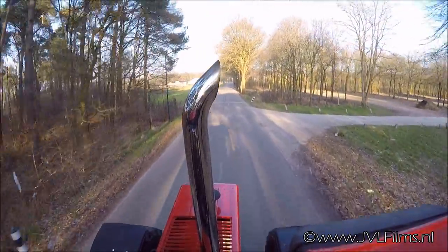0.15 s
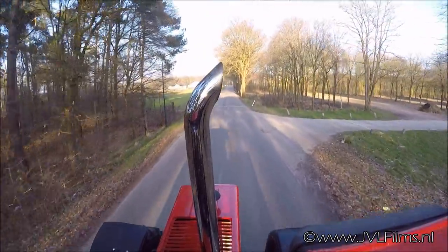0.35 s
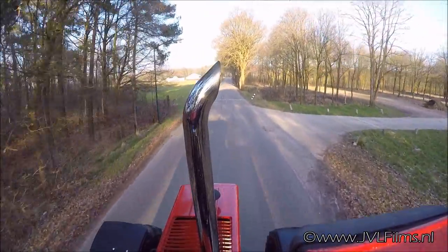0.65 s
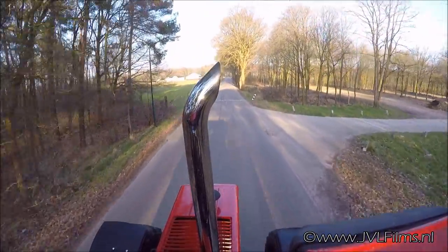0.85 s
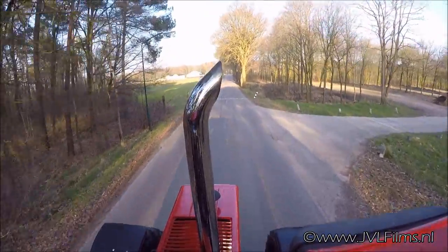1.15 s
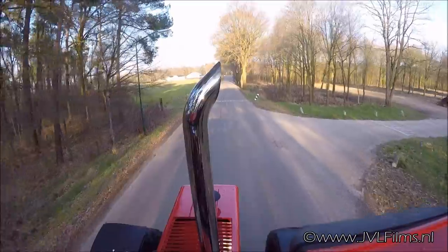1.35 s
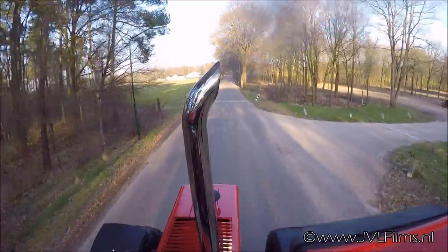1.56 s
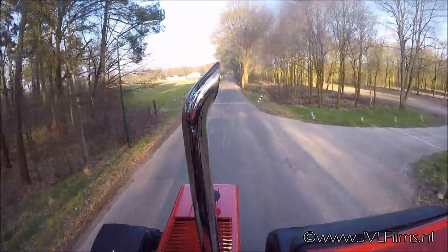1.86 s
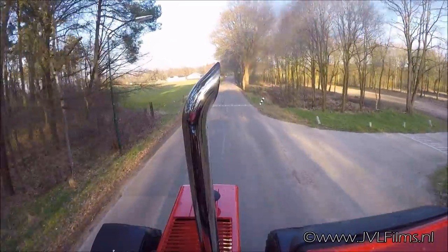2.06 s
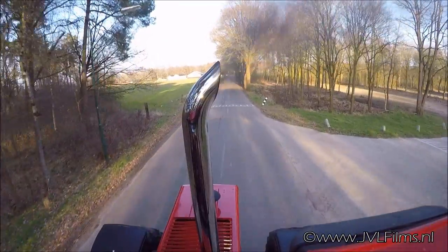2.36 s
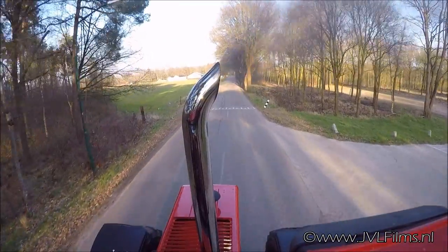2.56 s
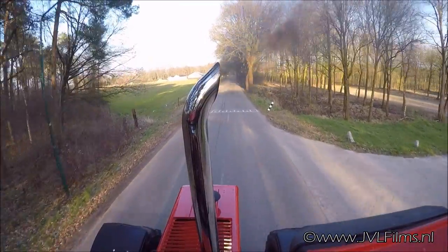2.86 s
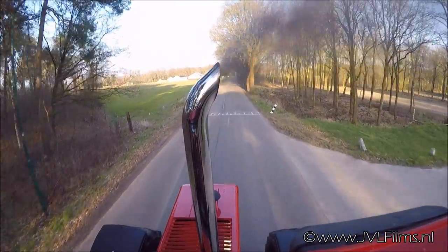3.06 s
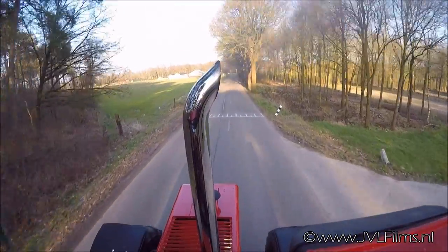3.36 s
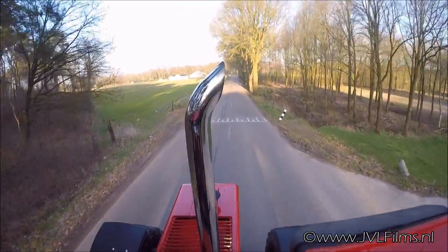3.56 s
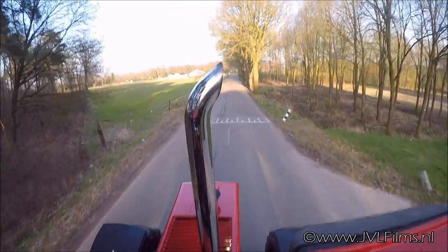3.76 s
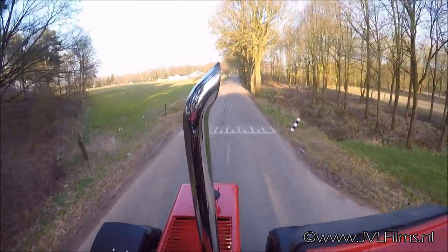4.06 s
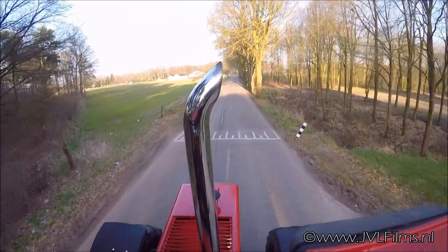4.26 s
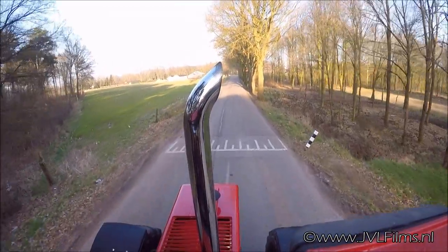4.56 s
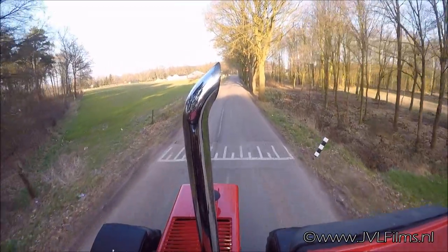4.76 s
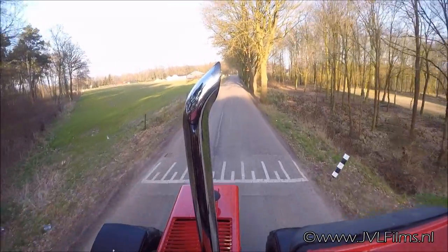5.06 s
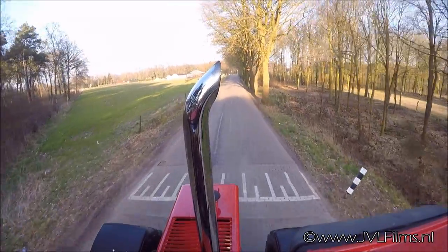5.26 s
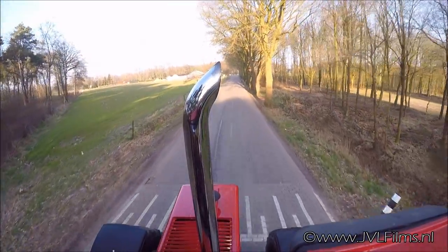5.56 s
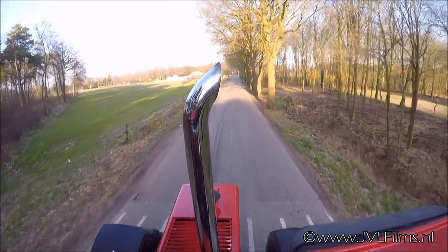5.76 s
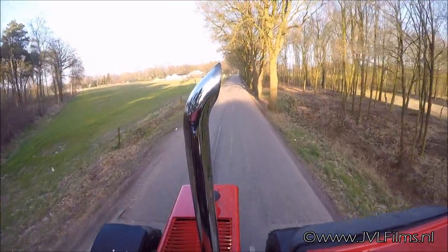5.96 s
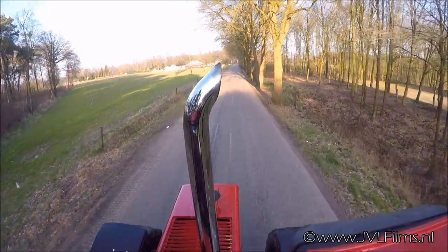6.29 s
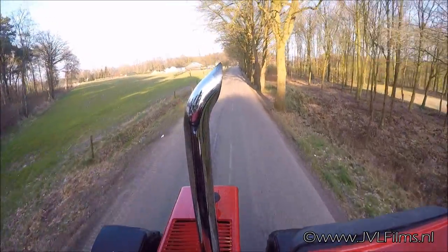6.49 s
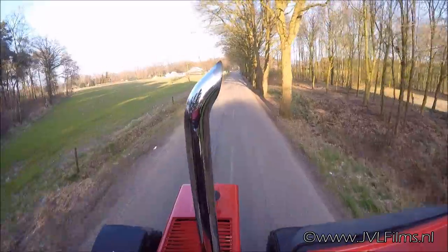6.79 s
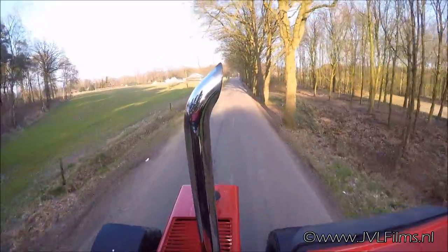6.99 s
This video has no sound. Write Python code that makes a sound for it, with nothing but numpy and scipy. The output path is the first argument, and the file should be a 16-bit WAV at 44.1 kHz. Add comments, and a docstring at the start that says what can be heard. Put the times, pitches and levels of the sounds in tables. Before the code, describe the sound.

A diesel tractor drives along a road, heard from inside the cab over a constant low boom and tyre rumble. The knocking engine picks up and pulls hard for about two seconds, its open exhaust rasping while the turbo whistle climbs. Then the throttle eases, the whistle winds down and the engine drones on. Three bumps, one early and two after the pull, thump the frame and rattle loose panels close by.

```python
"""A diesel lugs over a low boom, heard from a microphone in the cab of a tractor driving along a road.
The engine knocks, its turbo whistles, and bumps thump the frame and rattle loose panels close by.
It pulls hard for two seconds, each firing a rasping puff of gas from the open exhaust stack outside.
Then it eases off and the whistle winds down, while the cab booms on and the tyres rumble below."""
import sys
import numpy as np
from scipy import signal
from scipy.fft import rfft, irfft
from scipy.io import wavfile
from scipy.ndimage import map_coordinates

SR = 44100
rng = np.random.default_rng(int(sys.argv[2]) if len(sys.argv) > 2 else 0)


def log_audio(samples):
    """Write samples as a 16-bit WAV file to the path given in sys.argv[1]."""
    # one column per channel
    frames = np.atleast_2d(samples).T
    # limit to full scale, then quantise
    limited = np.clip(frames, -1, 1)
    pcm = np.round(limited * 32767).astype(np.int16)
    wavfile.write(sys.argv[1], SR, pcm)


N = 314433
TIME = np.arange(N) / SR


def amp(db):
    """Decibels to gain."""
    return 10 ** (np.asarray(db) / 20)


def unit(x):
    """Scales to rms 1."""
    return x / np.sqrt(np.mean(x ** 2) + 1e-20)


def follow(rows):
    """A curve of (seconds, value) at every sample."""
    return np.interp(TIME, *np.transpose(rows))


def db_at(spectrum, hz):
    """Reads rows of (Hz, dB) on a log-frequency axis."""
    freqs, db = np.transpose(spectrum)
    return np.interp(np.log(hz + 1), np.log(freqs), db)


def wander(rate_hz):
    """Random drift of rms 1, mostly slower than rate_hz."""
    hz = np.fft.rfftfreq(N, 1 / SR)
    return unit(irfft(rfft(rng.standard_normal(N)) / (1 + (hz / rate_hz) ** 4), N))


def per_firing(firings):
    """A fresh random value for each firing."""
    return rng.standard_normal(1024)[np.round(firings).astype(int) % 1024]


def lobe(firings, centre, rise, fall):
    """One swell per firing; centre and flanks are in fractions of the firing period."""
    offset = (firings - centre + .5) % 1 - .5
    return np.exp(-.5 * (offset / np.where(offset < 0, rise, fall)) ** 2)


# The cab around the microphone. Each row: centre in Hz, width in Hz, gain in dB.
CAB_RESONANCES = [(508, 34, 5), (630.4, 33, 8.5), (734, 82, -8.5), (952, 22.6, 9.5), (1006.8, 36, 9),
                  (1106, 70, 6.5), (1267, 43, -5), (1725, 81, -8), (1782, 48, 8), (2246, 21, 6.5),
                  (2508, 157, -6), (2880, 49, 6), (3127, 164, -9), (3690, 300, -4.5), (4230, 300, 3.5),
                  (4570, 160, -5), (4956, 205, 6), (6020, 620, -4.5), (6494, 140, 8.5), (9800, 400, -1.5)]

def cab_db(hz):
    """The cab's resonances lift some frequencies and hollow out others."""
    return sum(db / (1 + (2 * (hz - centre) / width) ** 2) for centre, width, db in CAB_RESONANCES)


def colour(x, spectrum):
    """Causal filter of unit energy: a source's own spectrum, then the cab."""
    size = 8192
    hz = np.fft.rfftfreq(size, 1 / SR)
    cepstrum = irfft(np.log(amp(db_at(spectrum, hz) + cab_db(hz))))
    cepstrum[1:size // 2] *= 2  # fold to minimum phase
    cepstrum[size // 2 + 1:] = 0
    taps = irfft(np.exp(rfft(cepstrum)))
    return signal.oaconvolve(x, taps / np.linalg.norm(taps))[:N]


# How hard the engine works. Each row: time in seconds, throttle from 0 to 1.
THROTTLE = [(0, .17), (.4, 0.24), (.62, 0.41), (.92, 0.63), (1.1, 0.49), (1.33, .69), (1.47, 0.85),
            (2.1, 0.93), (2.42, 0.98), (2.7, 0.88), (3.15, 0.93), (3.39, 0.81), (3.5, 0.48), (3.72, 0.25),
            (4.3, 0), (5.6, 0.35), (6.2, 0.3), (7.13, 0.23)]

def knock_db(range_db=12.5, knee_throttle=0.28):
    """Combustion relative to full load: it comes up with the first bit of throttle, then levels off."""
    return -range_db * np.exp(-follow(THROTTLE) / knee_throttle)


def blast_db(full_db=-20.5, range_db=32.5, coast_db=-49.5):
    """The exhaust blast grows steeply once the throttle is past coasting."""
    return np.maximum(full_db - range_db * (1 - follow(THROTTLE)), coast_db)


# The low note as it reaches into the cab, and the pipe's buzz. Each row: frequency in Hz, gain in dB.
CAB_BASS = [(43, -5), (46, 0), (48.5, 1.5), (52, -3.5), (54.8, -7.5), (60, -2), (62, -2.5), (86, -5.5),
            (93, -4.5), (96, 1.5), (108, 2), (117, 4), (120, 2), (122.5, -11)]
PIPE_BUZZ = [(130, -11), (170, -13), (205, -16), (238, -10), (270, -24.5), (305, -24), (350, -27),
             (420, -34), (520, -27), (620, -32.5), (1000, -42)]
# The note sinks as the throttle eases. Each row: start in seconds, dip in dB, recovery in seconds.
THROTTLE_LIFTS = [(3.42, -14, .7), (5.85, -7, 2.2)]

def exhaust_note(firings, sink_s=0.073):
    """Pressure pulses from the stack: two strong low orders, and a buzz that grows with load."""
    firing_hz = follow(FIRING_RATE)
    low = -sum(amp(db_at(CAB_BASS, k * firing_hz)) * np.cos(2 * np.pi * k * firings) for k in (1, 2))
    burble_db = 1.5 * (1 - follow(THROTTLE)) * wander(10)
    low_db = -20.5 + 1.26 * knock_db() + burble_db + wander(32)
    for start, dip_db, recovery in THROTTLE_LIFTS:
        age = np.maximum(TIME - start, 0)
        low_db += dip_db * np.minimum(age / sink_s, 1) * np.exp(-age / recovery)
    uneven = firings + 0.0048 * wander(14) + 0.198
    buzz = np.zeros(N)
    for k in range(3, 13):
        even_db = 1.2 * (-1) ** k  # even orders lead
        order_db = db_at(PIPE_BUZZ, k * firing_hz) + cab_db(k * firing_hz) + even_db
        buzz += amp(order_db) * np.cos(2 * np.pi * k * uneven)
    return np.sqrt(2) * low * amp(low_db) + buzz * amp(blast_db() + 2 + 2.1 * wander(36))


# The boom all around the microphone. Each row: time in seconds, level in dB.
BOOM_LEVEL = [(0.0, -18), (0.24, -13), (0.5, -25), (0.54, -16), (1.21, -12.5), (1.41, -18), (2.54, -14),
              (2.76, -24), (3.1, -12.5), (3.43, -12.5), (3.51, -27), (3.63, -13), (7.05, -14), (7.13, -19)]

def cab_boom(mode_hz=24.67, drift_hz=.8):
    """The cab booms at its lowest mode, wavering in pitch and level."""
    hz = mode_hz + drift_hz * wander(2.14)
    level_db = follow(BOOM_LEVEL) + 1.9 * wander(11.6)
    return np.sqrt(2) * amp(level_db) * np.sin(2 * np.pi * np.cumsum(hz) / SR)


# The rumble from under the floor. Each row: frequency in Hz, relative level in dB.
RUMBLE_SPECTRUM = [(12, -43.5), (28, -9.5), (45, 4), (65, -0.5), (90, -4), (118, 3), (145, -12.5),
                   (200, -16.5), (240, -11.5), (280, -33), (500, -44.5), (1200, -65.5)]
# Rough road. Each row: middle in seconds, added rumble in dB, half length in seconds.
ROUGH_PATCHES = [(0.615, -19.5, 0.17), (3.689, -22, 0.095), (6.802, -19, 0.094)]

def tyre_rumble():
    """The tyres rumble through the frame, more under load and most on the rough patches."""
    power = amp(-26.5 + .65 * knock_db()) ** 2
    for middle, db, half in ROUGH_PATCHES:
        power += amp(db) ** 2 * np.exp(-((TIME - middle) / half) ** 2)
    return np.sqrt(power) * unit(colour(rng.standard_normal(N), RUMBLE_SPECTRUM))


# The iron block, just outside the cab. Each row: frequency in Hz, relative level in dB.
BLOCK_SPECTRUM = [(100, -26.5), (250, 0.5), (320, 3.5), (420, 0), (560, -3.5), (850, 5.5), (1150, 1),
                  (1400, -2), (2400, -0.5), (3400, -5.5), (5000, -6), (6000, -14), (7800, -24.5),
                  (8700, -26.5), (15000, -36.5)]
ENGINE_DB = -33  # base level of clatter and whistle

def engine_clatter(firings):
    """Dense knocking of the block and gears, with an injector tick between the puffs."""
    knock = unit((1 + .5 * lobe(firings, centre=0.54, rise=0.21, fall=0.25)) * amp(2 * wander(260)))
    tick = unit(lobe(firings, centre=0.33, rise=0.19, fall=0.34) * amp(4 * per_firing(firings)))
    steel = [(3000, -30), (6800, -51), (7500, -2.0), (7950, -2), (8400, -26), (14000, -24)]
    block = colour(knock * rng.standard_normal(N), BLOCK_SPECTRUM)
    injectors = colour(tick * rng.standard_normal(N), steel)
    return amp(ENGINE_DB + knock_db()) * (block + amp(-21.5) * injectors)


def turbo_hz(start_s=1.31, end_s=3.44, lag_s=.8, idle_hz=3850, full_boost_hz=9800):
    """The rotor spins up toward full boost through the pull and winds down with the same lag."""
    spin_up = 1 - np.exp(-np.clip(TIME - start_s, 0, end_s - start_s) / lag_s)
    wind_down = np.exp(-np.maximum(TIME - end_s, 0) / lag_s)
    return idle_hz + (full_boost_hz - idle_hz) * spin_up * wind_down


# How strongly the whistle carries. Each row: pitch in Hz, gain in dB.
WHISTLE_GAIN = [(3860, -10.5), (4300, -2), (4750, -8), (5400, -7), (6600, -11.5), (9500, -24)]

def turbo_whistle(firings):
    """The whistle escapes with each puff, and its pitch slides down as the gas slows."""
    puff_phase = (firings + .5) % 1 - .5
    throttle = follow(THROTTLE)
    rotor_hz = turbo_hz()
    hz = rotor_hz - (650 + 600 * throttle) * puff_phase + 85 * wander(735) + 55 * per_firing(firings)
    angle = 2 * np.pi * np.cumsum(hz) / SR
    gate = unit((0.075 + lobe(firings, centre=-0.015, rise=0.11, fall=0.27)) * amp(2.7 * wander(130)))
    # the overtone shows only while the turbo is slow and under load
    octave = amp(-13.5 - 21 * np.maximum(np.log2(hz / 3800), 0) + .8 * np.minimum(blast_db() + 22, 0))
    load_db = knock_db() + 4.5 * throttle ** 2
    level_db = ENGINE_DB + load_db + db_at(WHISTLE_GAIN, rotor_hz) + .5 * cab_db(hz)
    return amp(level_db) * gate * (np.sin(angle) + octave * np.sin(2 * angle))


def chatter(rows, attack_s=0.0013):
    """Showers of small contacts, each dying by 60 dB over its ring time."""
    power = np.zeros(N)
    for start, db, ring in rows:
        age = np.maximum(TIME - start, 0)
        attack = 1 - np.exp(-age / attack_s)
        power += (attack * amp(db - 60 * age / max(ring, .01))) ** 2
    return np.sqrt(power) * unit(rng.standard_normal(N) * amp(0.97 * wander(470)))


def settling(count=6, after_s=.28, ring_s=0.2):
    """Rows for chatter: small rattles at random moments on and after each rough patch."""
    rows = []
    for middle, _, half in ROUGH_PATCHES:
        progress = (np.arange(count) + rng.random(count)) / count
        rows += [(middle - half + p * (half + after_s), -29.5 - 3 * p, ring_s) for p in progress]
    return rows


# Loose panels close to the microphone. Each row: start in seconds, relative level in dB,
# ring time in seconds, tilt toward the thin panel in dB.
RATTLES = [(0.018, -24.5, 0.047, 7), (.156, -27.5, 0.14, 0), (.606, -24.5, 0.095, 19), (.692, -20, .17, 5),
           (.784, -14.5, 0.08, 13), (3.649, -18, 0.16, -3), (3.664, -9, 0.15, -2), (3.714, -15, 0.2, 4),
           (3.749, -16, 0.19, 1), (3.804, -21, 0.092, -2), (3.843, -27, 0.092, -8), (3.863, -17, 0.055, 7),
           (3.897, -26, .14, -3), (4.013, -20, .11, 3.5), (4.211, -17.5, 0.082, -3), (6.061, -32, .081, 18),
           (6.169, -21, 0.064, 10), (6.548, -3, 0.022, -1.5), (6.625, -20, 0.072, -5),
           (6.687, -14, 0.17, 2.5), (6.703, -14.5, 0.15, -3), (6.781, -15.5, 0.19, 0),
           (6.825, -14, 0.18, 6), (6.852, -16, 0.086, -6), (6.874, -20.5, 0.077, -3),
           (6.972, -18, 0.057, 9), (7.034, -14.5, .09, -2)]
# The ring of each panel. Each row: frequency in Hz, relative level in dB.
HEAVY_PANEL = [(240, -5), (480, -14.5), (800, 4), (1050, 5.5), (1250, 3), (1470, 4.5), (1700, -4.5),
               (2050, -6), (2900, -29), (3500, -24), (5400, -23), (6500, -37), (14000, -70)]
THIN_PANEL = [(500, -30), (1900, -8.5), (2200, -8.5), (2440, 8), (2620, -2.5), (2850, -11.5), (3600, -20),
              (4600, -34), (5400, -14.5), (6500, -37), (14000, -47)]

def panel_rattles():
    """Bumps shake a heavy and a thin panel together."""
    small = settling()
    heavy = chatter([(start, db - tilt / 2, ring) for start, db, ring, tilt in RATTLES] + small)
    thin = chatter([(start, db + tilt / 2, ring) for start, db, ring, tilt in RATTLES] + small)
    return amp(-6) * colour(heavy, HEAVY_PANEL) + amp(-11.5) * colour(thin, THIN_PANEL)


# Jolts from below the cab. Each row: start in seconds, relative level in dB, ring time in seconds.
JOLTS = [(.695, -23.5, 0.056), (3.675, -17.5, 0.071), (3.71, -21.5, 0.18), (6.69, -38, 0.097),
         (6.76, -31, .21), (6.82, -19, 0.19)]
# The frame's dull ring. Each row: frequency in Hz, relative level in dB.
FRAME_SPECTRUM = [(50, -10), (125, 0), (170, -3.5), (245, 7), (290, -17.5), (360, -29), (470, -7.5),
                  (700, -24), (2000, -57)]

def frame_thumps():
    """The frame thumps over the worst bumps."""
    return amp(-1) * colour(chatter(JOLTS), FRAME_SPECTRUM)


# The ringing pipe, a short way outside the cab. Each row: frequency in Hz, relative level in dB.
GROWL_SPECTRUM = [(150, -10), (300, -9), (420, -15.5), (520, -6.5), (640, -3), (760, -9.5), (950, 4.5),
                  (1030, 9), (1120, -8.5), (1500, -5), (2300, -16.5), (4000, -57.5)]

def pipe_growl(firings, cylinders=3, points=256):
    """Each cylinder bangs in its own way, so the ringing of the pipe repeats with the engine cycle."""
    bang = lobe(firings, centre=-0.218, rise=0.23, fall=0.96)
    position = firings / cylinders % 1 * points
    cycle_noise = map_coordinates(rng.standard_normal(points), [position], order=3, mode="grid-wrap")
    drive = bang * cycle_noise * amp(2.3 * per_firing(firings))
    return amp(blast_db() - 6) * unit(colour(drive, GROWL_SPECTRUM))


# The front of each puff at the stack's mouth. Each row: frequency in Hz, relative level in dB.
RASP_SPECTRUM = [(150, -33), (400, -12), (800, -7), (1400, -13.5), (2000, 3), (2900, 2.5), (4200, -1.5),
                 (5200, -5.5), (7500, -9), (9000, -20), (11000, -19), (12000, -33), (15000, -31)]

def exhaust_rasp(firings):
    """Each firing throws out a turbulent puff: a crackling bright front, then a duller rush."""
    force = amp(0.99 * per_firing(firings))
    timing = firings + 0.013 * wander(35)
    crackle = amp(1.9 * wander(800)) * rng.standard_normal(N)
    front = unit(force * lobe(timing, centre=-0.14, rise=0.065, fall=0.16) * crackle)
    flow = unit(force * (0.37 + lobe(timing, centre=-0.019, rise=0.18, fall=0.22)))
    rush = flow * rng.standard_normal(N)
    dull = [(200, 0.0), (500, -4), (1000, 0.5), (1500, 2.0), (2200, 2.5), (3000, -2.5), (4200, 2),
            (5200, -5.5), (7500, -14.5), (9000, -22), (15000, -30)]
    return amp(blast_db()) * (amp(-5) * colour(front, RASP_SPECTRUM) + amp(-4) * colour(rush, dull))


def pipe_zing(firings, centre_hz=4150):
    """Each puff makes the mouth of the steel stack sing briefly, never twice at quite the same pitch."""
    puff_phase = (firings + .5) % 1 - .5
    hz = centre_hz * (1 - 0.12 * puff_phase + .035 * per_firing(firings) + 0.0207 * wander(565))
    gate = unit(lobe(firings, centre=0, rise=0.073, fall=0.14) * amp(2.2 * per_firing(firings)))
    return amp(blast_db() - 3.5) * gate * np.sin(2 * np.pi * np.cumsum(hz) / SR)


# A tick in the cab. Each row: start in seconds, relative level in dB, ring time in seconds.
TICKS = [(3.965, -24.5, 0.015)]

def dry_tick():
    """Something small ticks once."""
    snap = [(500, -32), (1500, -9), (2000, 8), (3300, 8), (4200, 6), (6000, -12),
            (12000, -24), (15000, -32)]
    return amp(4) * colour(chatter(TICKS), snap)


# Engine speed along the road. Each row: time in seconds, firings per second.
FIRING_RATE = [(0.0, 45.67), (0.8, 43.2), (1.0, 43.6), (1.2, 43.24), (1.55, 48.57), (1.9, 52.07),
               (2.5, 56.43), (3.22, 61.09), (3.42, 61.32), (3.6, 52.79), (3.8, 51.29), (4.0, 52.01),
               (4.25, 50.91), (5.0, 48.92), (6.0, 46.91), (6.3, 45.97), (6.7, 47.44), (7.13, 48.03)]

def scene():
    """One microphone in the cab; all engine sounds follow one crankshaft."""
    firings = np.cumsum(follow(FIRING_RATE)) / SR + .05  # running count
    exhaust = exhaust_note(firings) + pipe_growl(firings) + exhaust_rasp(firings) + pipe_zing(firings)
    engine = turbo_whistle(firings) + engine_clatter(firings)
    ride = cab_boom() + tyre_rumble() + frame_thumps() + panel_rattles() + dry_tick()
    return (exhaust + engine + ride)[None]


def record(dry):
    """The microphone chain rounds off the highest peaks, then limits the band."""
    knee, headroom, cutoff_hz = .65, .25, 15400
    held = np.clip(dry, -knee, knee)
    soft = held + headroom * np.tanh((dry - held) / headroom)
    lowpass = signal.firwin(301, cutoff_hz, window=("kaiser", 9), fs=SR)
    return signal.oaconvolve(soft, lowpass[None], "same")


dry = scene()
out = record(dry)
log_audio(out)
```